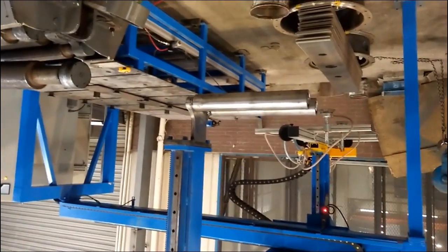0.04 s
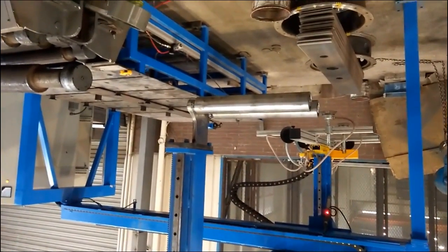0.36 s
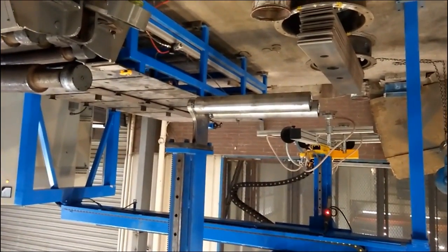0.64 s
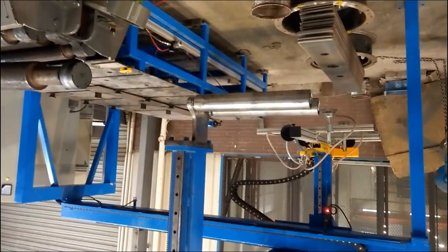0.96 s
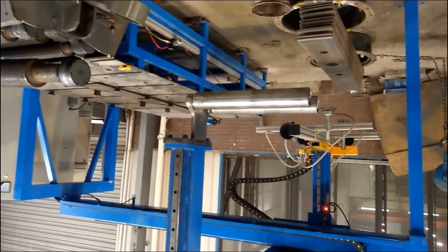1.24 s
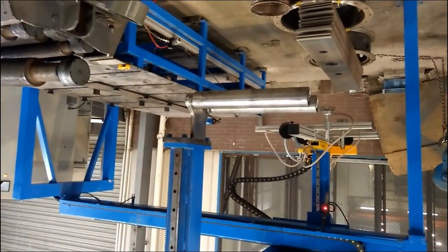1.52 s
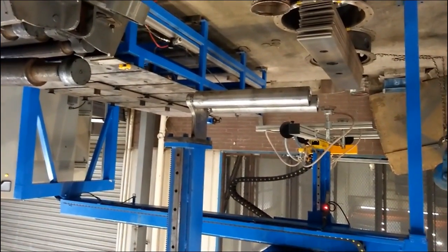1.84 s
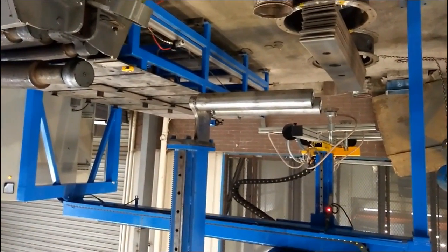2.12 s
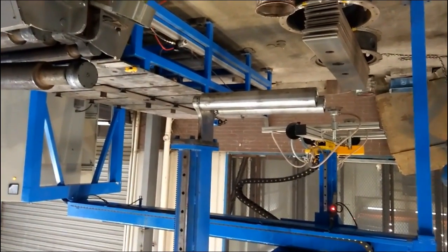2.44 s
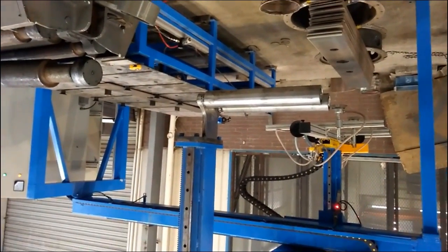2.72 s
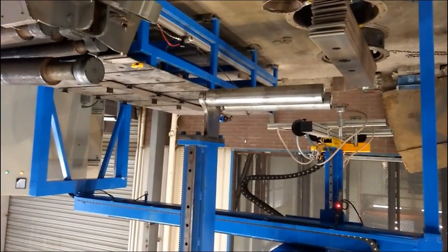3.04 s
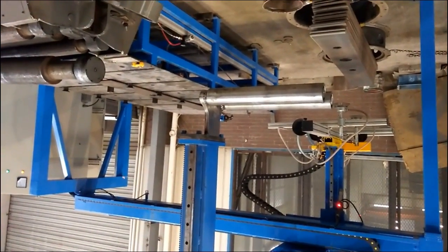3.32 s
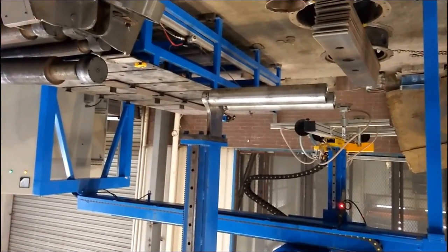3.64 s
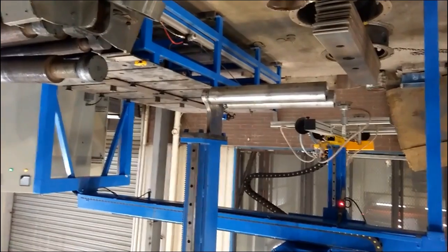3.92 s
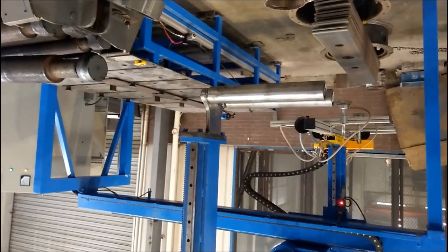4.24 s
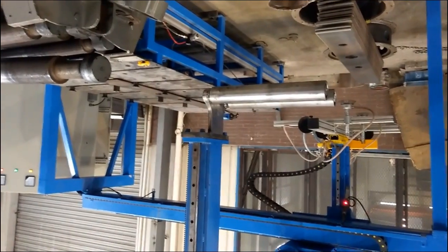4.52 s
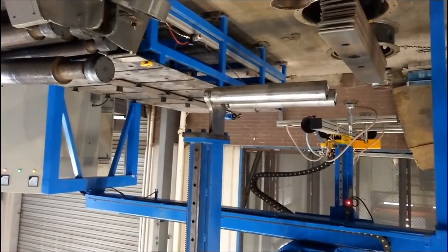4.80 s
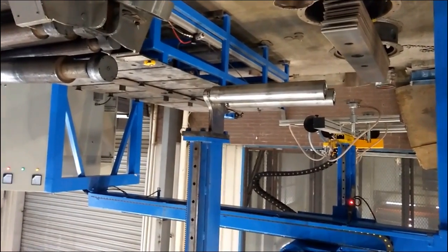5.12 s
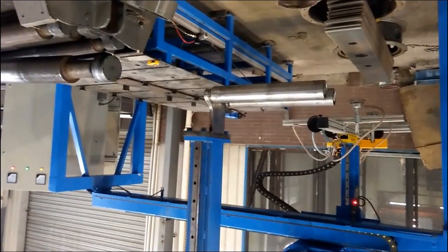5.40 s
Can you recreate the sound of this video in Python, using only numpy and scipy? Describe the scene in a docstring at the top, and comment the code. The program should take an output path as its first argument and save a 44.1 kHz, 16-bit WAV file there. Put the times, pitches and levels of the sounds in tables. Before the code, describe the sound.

An air-driven metal rolling line works in a reverberant hall. A short hiss leads into a hard, rattling steel slam and three weaker clanks. After a lull of low motor hum, rumble and small thumps, a cylinder vents a long, high hiss, pauses briefly and hisses again. Near the end the carriage crashes into its far stop, the loudest sound, and rings. The impacts sit centrally, while the hiss sounds slightly wider.

```python
"""A steel carriage slams into its stops, rattles and rings on a pneumatic metal rolling line.
Each impact excites the modes of the frame, which decay together with the reverberation of a large
workshop. Compressed air drives the cylinder out and back and hisses from its ports as turbulent
jet noise. Underneath are small knocks, a steady leak, humming motors and rumbling rollers."""
import sys
import numpy as np
from scipy import signal
from scipy.fft import rfft, irfft, next_fast_len
from scipy.io import wavfile
from scipy.ndimage import uniform_filter1d

SR = 44100
rng = np.random.default_rng(int(sys.argv[2]) if len(sys.argv) > 2 else 0)


def pcm_store(signal):
    """Save signal as 16-bit PCM."""
    levels = np.round(np.clip(np.atleast_2d(signal), -1, 1) * 32767)
    wavfile.write(sys.argv[1], SR, levels.astype(np.int16).T)


N = 249606

# impacts of the carriage: (time [s], level [dB], place struck, brightness [dB/octave],
# rattle length [s], rattle level relative to the slam [dB])
SLAMS = [(0.388, -17, "near stop", 0.5, .39, -1.5), (.595, -24.5, "rollers", -5, .12, -4.5),
         (0.875, -28, "rollers", 4, .13, -2.5), (1.272, -30, "latch", 0, .17, -8.5),
         (5.227, -19.5, "far stop", -2, .02, -3), (5.245, -13, "far stop", -6, .05, 0.5),
         (5.308, -14.5, "far stop", 4.5, .26, -3)]
# clatter spectrum of each place struck: (frequency [Hz], relative density [dB])
NEAR_STOP_SPECTRUM = [(59, -77), (100, -21), (289, -19), (375, -20.5), (468, -3), (507, -19), (549, -2),
                      (684, -10), (1000, 0), (1080, -4), (1300, -5), (2890, -16.5), (3200, -22.5),
                      (5830, -11), (12000, -53), (15600, -98), (22000, -120)]
ROLLER_SPECTRUM = [(240, -67), (400, -37), (694, -11), (749, -0.5), (838, -14), (1280, -4.5), (1610, -9.5),
                   (2280, -26.5), (2650, -15.5), (3050, -39), (5850, -27), (8000, -57), (10400, -84.5),
                   (17600, -120)]
LATCH_SPECTRUM = [(210, -63), (350, -24), (467, -11), (512, -28), (561, -11.5), (1020, -8.5), (1620, -0.5),
                  (1950, -23), (2190, -11), (3080, -29.5), (6000, -20.5), (8000, -34), (10400, -53),
                  (17600, -120)]
FAR_STOP_SPECTRUM = [(59, -67), (100, -46), (313, -19.5), (468, -28), (507, -39), (549, -9.5), (712, -10),
                     (870, -6), (962, -7), (1410, -2.5), (1520, -5), (2190, -10), (3330, -19.5),
                     (6200, -12.5), (12000, -52), (15600, -82), (22000, -120)]
# response of those four places: (clatter gain [dB], mode gain [dB], decay time factor)
PLACE_RESPONSE = [(-2, 1, 1.014), (-1.5, -3.1, 0.73), (-4.5, -3.5, 0.78), (-3, -1.74, 0.9)]

def carriage():
    """Impact excitation: the point of contact sets how strongly each mode of the frame responds."""
    out = np.zeros((2, N))
    places = [("near stop", NEAR_STOP_SPECTRUM), ("rollers", ROLLER_SPECTRUM),
              ("latch", LATCH_SPECTRUM), ("far stop", FAR_STOP_SPECTRUM)]
    for place, (name, spectrum) in enumerate(places):
        blows = [blow for start, db, struck, *shape in SLAMS if struck == name
                 for blow in rattle(start, db, *shape)]
        onset = blows[0][0]
        t = onset + np.arange(54000) / SR
        clatter_db, modes_db, sustain = PLACE_RESPONSE[place]
        add(out, onset, gain_of(clatter_db) * clatter(blows, t, spectrum, sustain))
        add(out, onset, gain_of(modes_db) * frame_modes(blows, t, place, sustain))
    return out


def rattle(start, db, bright, length, rattle_db, gap_s=0.033, scatter=0.31, fade_db_per_s=62):
    """Inelastic rebound: a slam is followed at uneven gaps by ever weaker, duller blows."""
    slam_build_s, rebound_build_s, dulling_db_per_octave_per_s = 0.012, 0.0035, 12.5
    ages = gap_s * (np.arange(1, 25) + scatter * (2 * rng.random(size=24) - 1))
    blows = [(start, db, slam_build_s, bright)]
    for age in ages[ages < length]:
        level = db + rattle_db - fade_db_per_s * age
        blows.append((start + age, level, rebound_build_s, bright - dulling_db_per_octave_per_s * age))
    return blows


# joint decay of steel and hall: (frequency [Hz], T60 before the place's factor [s])
CLATTER_DECAY = [(150, 0.86), (600, 0.73), (1300, 0.62), (2500, 0.93), (6000, 0.36), (12000, 0.5)]

def clatter(blows, t, spectrum, sustain, bands=10, chatter_db=0.54, chatter_per_s=170):
    """Modal overlap: close modes merge into noise that decays band by band; loose parts chatter."""
    hz = np.fft.rfftfreq(len(t), 1 / SR)
    centres = np.geomspace(150, 12000, bands)
    dense_modes = rfft(noise(spectrum, len(t), ripple_db=3.5, ripple_hz=19, spread_db=-6))
    out = 0
    for centre, weights in zip(centres, np.eye(bands)):
        passband = curve_at(np.transpose([centres, weights]), hz)
        band = irfft(dense_modes * passband, len(t))
        out = out + band * ring_envelope(blows, t, centre, sustain * curve_at(CLATTER_DECAY, centre))
    return out * gain_of(chatter_db * wander(len(t), chatter_per_s))


# strong modes of the steel frame: (frequency [Hz], relative level when struck at the
# near stop [dB], at the rollers [dB], at the latch [dB], at the far stop [dB])
FRAME_MODES = [(477, -21, -32, -21, -31), (554, -16, -32, -24, -22), (762, -22, -10, -27, -20),
               (898, -29, -25, -15, -11), (1005, -11, -19, -14, -17), (1036, -16, -27, -12, -19),
               (1139, -19, -20, -19, -18), (1208, -22, -35, -31, -33), (1251, -23, -13, -31, -17),
               (1278, -12, -14, -12, -32), (1325, -14, -14, -17, -12), (1375, -33, -22, -35, -12),
               (1411, -20, -22, -22, -12), (1441, -14, -12, -15, -15), (1581, -15, -12, -15, -22),
               (1711, -13, -33, -23, -20), (1746, -19, -16, -19, -22), (1872, -19, -19, -30, -24),
               (1904, -41, -30, -41, -18), (2012, -21, -35, -36, -37), (2046, -25, -20, -33, -22),
               (2104, -32, -36, -48, -22), (2155, -42, -30, -23, -22), (2187, -33, -40, -34, -22),
               (2335, -31, -42, -42, -26), (2578, -34, -25, -25, -29), (2622, -37, -23, -24, -39),
               (2658, -27, -27, -43, -32), (2794, -29, -45, -37, -27), (2863, -27, -42, -35, -35)]
# their decay: (frequency [Hz], T60 before the place's factor [s])
MODE_DECAY = [(480, 0.82), (560, 0.66), (760, 0.8), (900, 1.07), (1010, 1.04), (1140, 1.44), (1300, 1.19),
              (1440, 1.3), (1600, 1.18), (1750, 0.98), (2100, 0.92), (2800, 0.44)]

def frame_modes(blows, t, place, sustain, blur_hz=4, flutter_db=5.0):
    """Free vibration: each mode is a damped sinusoid, which interfering echoes make waver."""
    out = 0
    for hz, *place_db in FRAME_MODES:
        cycles = hz * t + np.cumsum(blur_hz * wander(len(t), 47.2)) / SR + rng.random()
        flutter = unit_rms(gain_of(flutter_db * wander(len(t), 26.06)))
        envelope = ring_envelope(blows, t, hz, sustain * curve_at(MODE_DECAY, hz))
        out = out + gain_of(place_db[place]) * flutter * envelope * np.sin(2 * np.pi * cycles)
    return np.sqrt(2) * out


def ring_envelope(blows, t, hz, t60, pivot_hz=1300, reach_octaves=0.37, crash=0.12, crash_s=0.054):
    """Incoherent summation: blows add in energy, each dropping fast at first, then leaking away."""
    start, db, build_s, bright = np.transpose(blows)[..., None]
    coarse_t = t[::16]
    age = np.maximum(coarse_t - start, 0)
    octaves = np.clip(np.log2(hz / pivot_hz), -reach_octaves, reach_octaves)
    rise = 1 - np.exp(-age / build_s)
    decay = np.exp(-np.log(1000) * age / t60) + crash * np.exp(-age / crash_s)
    energy = (gain_of(db + bright * octaves) * decay) ** 2 * rise
    return np.interp(t, coarse_t, np.sqrt(energy.sum(0)))


# cylinder strokes: (valve opens [s], valve shuts [s], level [dB], opening time [s],
# tilt above the port resonance [dB/octave], direction)
STROKES = [(-.1, 0.692, -38, 0.056, 2.5, "out"), (2.579, 4.02, -38.5, 0.094, 1.5, "out"),
           (4.313, 5.654, -38, 0.22, 0.5, "back")]

def cylinder():
    """Pneumatic exhaust: every stroke vents compressed air as a jet."""
    return sum(jet(*stroke) for stroke in STROKES)


# exhaust port spectra, outward and return stroke: (frequency [Hz], relative density [dB])
OUT_PORT_SPECTRUM = [(1200, -29), (2600, -24), (3480, -18.5), (3700, -28.5), (4300, -27), (5200, -7),
                     (5880, 1.5), (6400, -14), (8000, -18.5), (8900, -28), (10000, -26), (10900, -32),
                     (13200, -33), (14200, -34)]
RETURN_PORT_SPECTRUM = [(1000, -18), (2100, -18), (3100, -10), (4000, -12.5), (5100, -6), (5700, 1),
                        (6080, 5), (6450, -3.5), (7000, -11), (8000, -10), (9000, -16.5), (12000, -23),
                        (14200, -23)]
PORT_RESONANCE_HZ, EMPTYING_DB_PER_S = 6000, 101

def jet(opens, shuts, db, opening_s, tilt, direction, sputter_db=0.5, eddy_db=1.9):
    """Turbulent jet noise, coloured by the port's resonance, dies away as the cylinder empties."""
    t = np.arange(N) / SR
    valve = np.clip((t - opens) / opening_s, 0, 1) ** 2
    flow_db = db + surge_db(t) - EMPTYING_DB_PER_S * np.maximum(t - shuts, 0)
    port = OUT_PORT_SPECTRUM if direction == "out" else RETURN_PORT_SPECTRUM
    spectrum = [(hz, level + tilt * max(np.log2(hz / PORT_RESONANCE_HZ), 0)) for hz, level in port]
    hiss = patchy(noise(spectrum, N, ripple_db=2.0, ripple_hz=40.24), eddy_db, window=512, span=9)
    return valve * hiss * gain_of(flow_db + sputter_db * wander(N, 70))


# pressure surges during the strokes: (time [s], length [s], boost [dB])
SURGES = [(0.23, 0.13, 4), (2.744, 0.16, 3.5), (3.14, 0.38, 5.5), (3.5, 0.22, 4), (3.837, 0.16, 4),
          (4.644, 0.37, 3)]

def surge_db(t, skew=0.46):
    """Jet noise grows with pressure: each surge is an arch that swells faster than it sinks."""
    return sum(db * np.sin(np.pi * np.clip((t - start) / length, 0, 1) ** skew)
               for start, length, db in SURGES)


# small knocks, thumps and scrapes, plus two rings of the frame: a narrow one at 760 Hz that
# lingers after the second slam at the rollers, and a low one at 477 Hz under the final slam:
# (time [s], level [dB], centre [Hz], half-width at -5 dB [octaves], build-up [s])
KNOCKS_AND_RINGS = [(.314, -31, 694, 0.34, 0.036), (.39, -44.5, 72, 0.4, .005),
                    (.968, -36, 760, 0.026, 0.007), (1.893, -53.5, 5240, .5, 0.0034),
                    (1.905, -48, 845, 0.3, .008), (2.094, -43.5, 134, 0.74, 0.0072),
                    (2.181, -46, 229, 0.47, .012), (3.77, -47, 130, 0.72, .012),
                    (4.25, -45, 100, 0.54, .015), (4.45, -45.5, 65, 0.35, .02),
                    (4.621, -46.5, 70, 1, 0.022), (5.25, -32, 477, 0.11, 0.0058)]

def knocks_and_rings(t60_s=0.75):
    """Damped resonance: each knock or ring of the frame is one band decaying with the hall's tail."""
    out, t = np.zeros((2, N)), np.arange(SR) / SR
    for start, db, hz, octaves, build_s in KNOCKS_AND_RINGS:
        envelope = (1 - np.exp(-t / build_s)) * np.exp(-np.log(1000) * t / t60_s)
        resonance = [(hz * 2 ** (k * octaves), -5 * k ** 2) for k in range(-4, 5)]
        add(out, start, gain_of(db) * noise(resonance, SR) * envelope)
    return out


# humming resonances of the drive: (frequency [Hz], relative level [dB], bandwidth [Hz])
HUM_RESONANCES = [(60.3, -76.5, 13), (213, -60.5, 13), (299, -65, 27), (409, -62, 13), (470, -61, 45),
                  (603, -63.5, 25), (736, -69, 85), (888, -58, 40), (1324, -66.5, 40), (1674, -63, 32),
                  (2400, -77, 30)]
# whirr of the motors: (frequency [Hz], relative density [dB])
WHIRR_SPECTRUM = [(110, -21), (180, -15), (327, -5), (367, -14.5), (470, -3), (522, -13.5), (602, -4.5),
                  (685, -11.5), (731, -4.5), (911, -5.5), (1170, -12), (1340, -9), (1590, -14.5),
                  (2260, -23), (4000, -32), (5200, -69), (8800, -120)]

def motors(idle_whirr_db=-53.5, hum_db=-1.5, rattle_db=1, churn_db=3.0):
    """Forced vibration: motors whirr and excite narrow resonances, both swelling with the load."""
    t, hum = np.arange(N) / SR, 0
    load = gain_of(load_db(t))
    for hz, db, width_hz in HUM_RESONANCES:
        phase = 2 * np.pi * hz * t
        narrowband = wander(N, width_hz) * np.cos(phase) + wander(N, width_hz) * np.sin(phase)
        hum = hum + gain_of(db) * narrowband
    whirr_gain = gain_of(idle_whirr_db + rattle_db * wander(N, 35)) * load
    whirr = whirr_gain * noise(WHIRR_SPECTRUM, N, ripple_db=0)
    return patchy(gain_of(hum_db) * unit_rms(load) * hum + whirr, churn_db, window=2048, span=4)


def load_db(t, start_s=2.17, take_up_s=0.11, step_db=2.2, climb_db_per_s=1.06):
    """Machine noise rises with load: from idling, a quick step and then a steady climb."""
    age = np.maximum(t - start_s, 0)
    return step_db * np.minimum(age / take_up_s, 1) + climb_db_per_s * age


# rumble of the rollers: (frequency [Hz], relative density [dB])
RUMBLE_SPECTRUM = [(20, -35), (34, -21), (47, 2), (60, 7), (88, -6), (120, 1.5), (155, 1.5), (200, -8.5),
                   (300, -43)]

def rollers(idle_db=-57, load_share=0.32, lurch_db=2.0):
    """Rolling noise: an uneven low rumble that partly follows the drive's load."""
    level_db = idle_db + load_share * load_db(np.arange(N) / SR) + lurch_db * wander(N, 9)
    return gain_of(level_db) * noise(RUMBLE_SPECTRUM, N)


# hiss of a small air leak: (frequency [Hz], relative density [dB])
LEAK_SPECTRUM = [(2500, -3.5), (4000, -11), (5200, -6.5), (6100, 4), (7000, -8), (8500, -17.5),
                 (10000, -26), (12000, -49), (14000, -47)]

def leak(db=-57, waver_db=1.0):
    """Orifice noise: air escaping continuously makes a faint, slightly wavering hiss."""
    return gain_of(db + waver_db * wander(N, 6.57)) * noise(LEAK_SPECTRUM, N)


# width of the sound field: (frequency [Hz], side relative to mid [dB])
STEREO_WIDTH = [(100, -41), (700, -54), (1400, -59), (2400, -55), (3800, -11), (5800, -33.5), (8000, -3.5),
                (10000, -6), (14000, -5)]

def noise(spectrum, n, ripple_db=2.3, ripple_hz=50, spread_db=0):
    """Spectral shaping: stereo noise of unit rms, finely rippled by resonances and reflections."""
    size = next_fast_len(n, True)
    hz = np.fft.rfftfreq(size, 1 / SR)
    ripple = np.interp(hz / ripple_hz, np.arange(4096), rng.uniform(-1, 1, 4096)) * np.sqrt(9 / 2)
    ripple *= np.minimum(hz / 1500, 1)  # the bass stays smooth
    colour = gain_of(curve_at(spectrum, hz) + ripple_db * ripple)
    mid, side = rfft(rng.standard_normal((2, size))) * colour
    side = side * gain_of(curve_at(STEREO_WIDTH, hz) + spread_db)
    return unit_rms(irfft([mid + side, mid - side], size)[:, :n])


def patchy(x, depth_db, window, span):
    """Random amplitude modulation: neighbouring bands swell and sink together in short patches."""
    cells = signal.stft(x, SR, nperseg=window)[2]
    across_bands = uniform_filter1d(rng.standard_normal(cells.shape[1:]), span, axis=0)
    patches = unit_rms(uniform_filter1d(across_bands, span, axis=1))
    return signal.istft(cells * gain_of(depth_db * patches), SR, nperseg=window)[1][:, :N]


def wander(n, per_s):
    """Low-pass random fluctuation with an rms near one."""
    position = np.arange(n) / SR * per_s
    return np.interp(position, np.arange(1024), rng.standard_normal(1024)) * np.sqrt(3 / 2)


def gain_of(db):
    """Decibels to amplitude."""
    return 10 ** (np.asarray(db) / 20)


def unit_rms(x):
    """Normalisation to an rms of one."""
    return x / np.sqrt(np.mean(abs(x) ** 2) + 1e-20)


def curve_at(points, hz):
    """Interpolation on a logarithmic frequency axis."""
    frequencies, values = np.transpose(points)
    return np.interp(np.log(hz + 1), np.log(frequencies + 1), values)


def add(mix, start_s, sound):
    """Delayed superposition of a sound onto the mix."""
    part = mix[:, round(start_s * SR):][:, :sound.shape[-1]]
    part += sound[..., :part.shape[-1]]


def scene():
    """Superposition: the sound pressures of all sources add."""
    return carriage() + cylinder() + knocks_and_rings() + motors() + rollers() + leak()


def record(dry, cutoff_hz=14300):
    """Band limiting: a steep low-pass filter removes the highest treble."""
    lowpass = signal.firwin(801, cutoff_hz, window=("kaiser", 9), fs=SR)
    return signal.oaconvolve(dry, lowpass[None], "same")


dry = scene()
out = record(dry)
pcm_store(out)
```